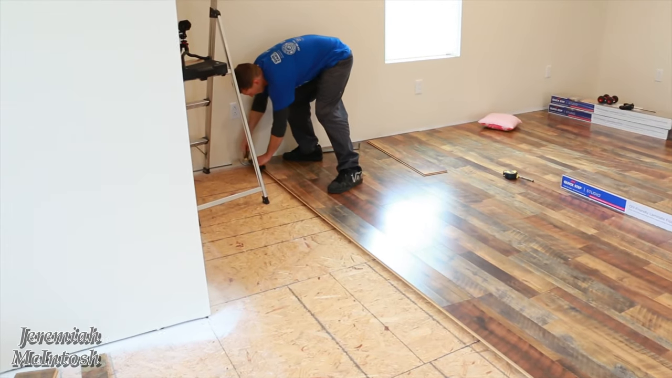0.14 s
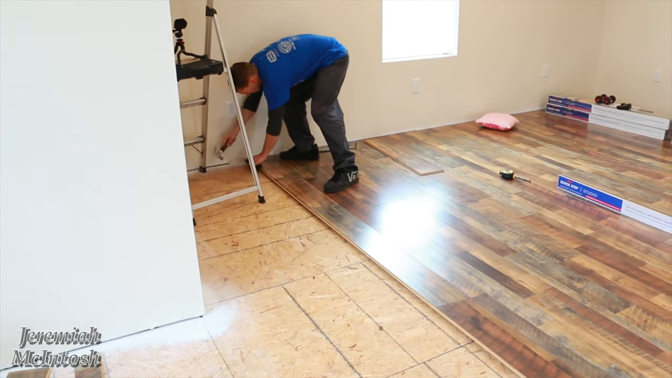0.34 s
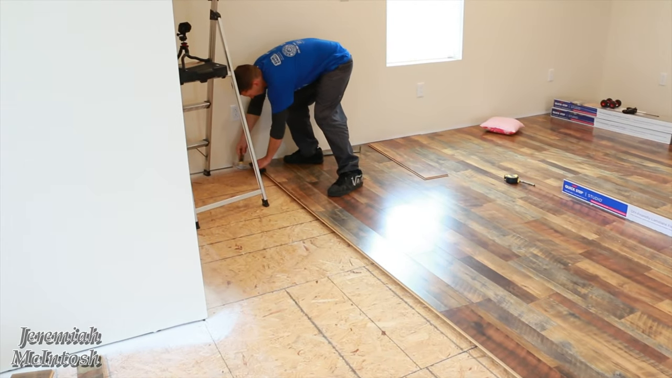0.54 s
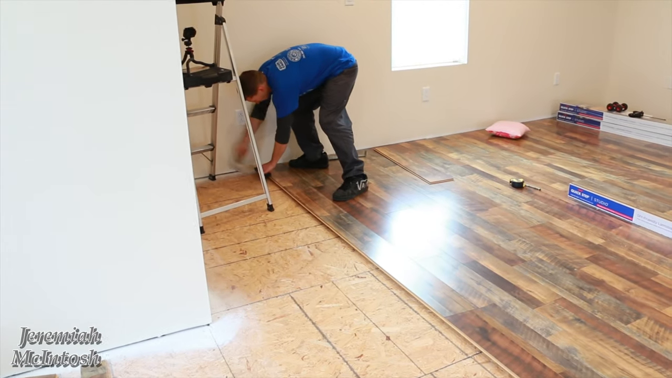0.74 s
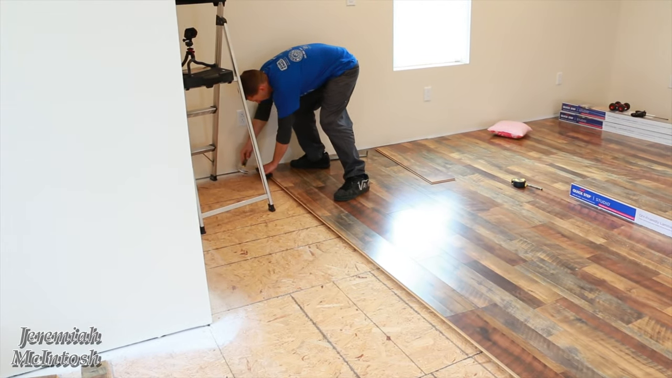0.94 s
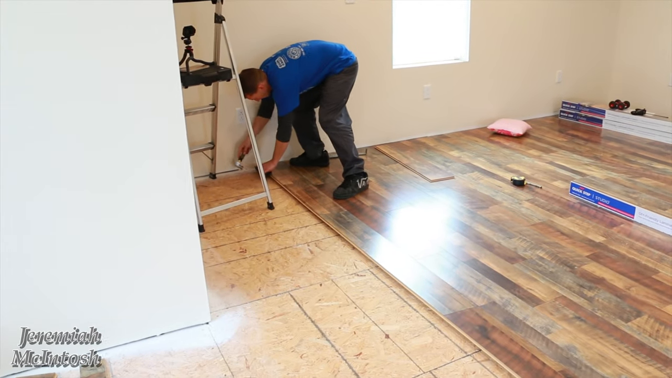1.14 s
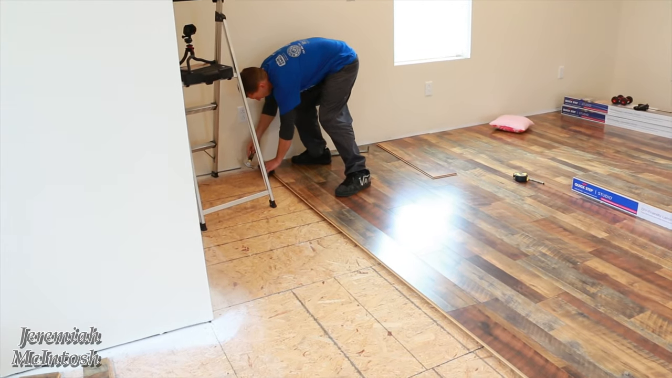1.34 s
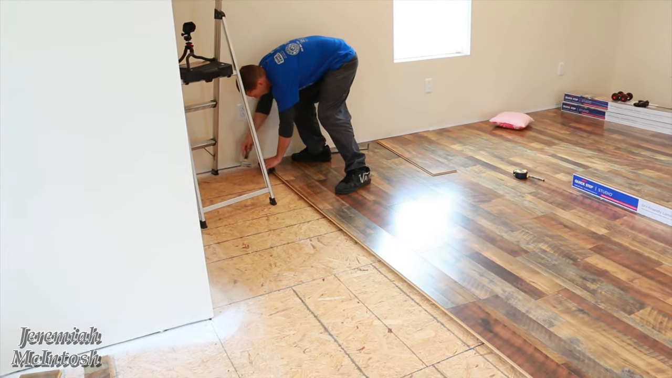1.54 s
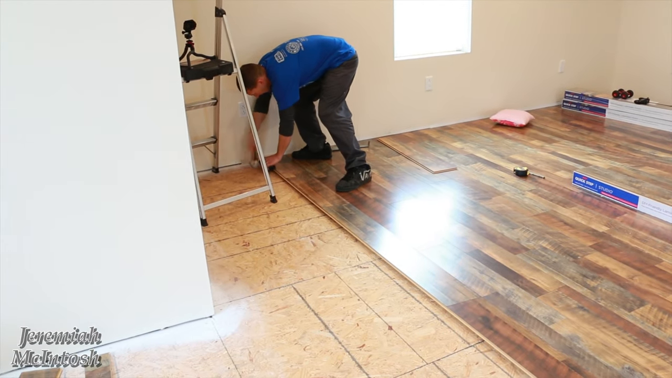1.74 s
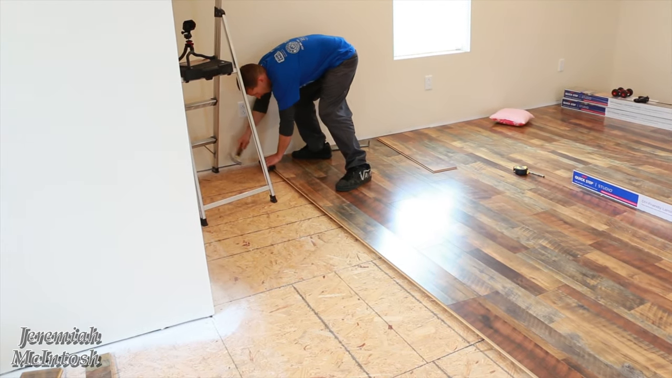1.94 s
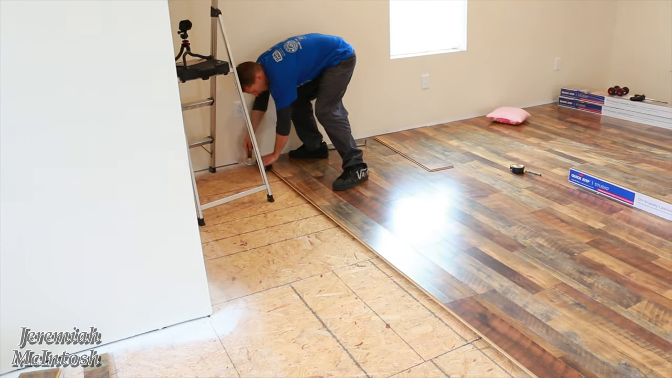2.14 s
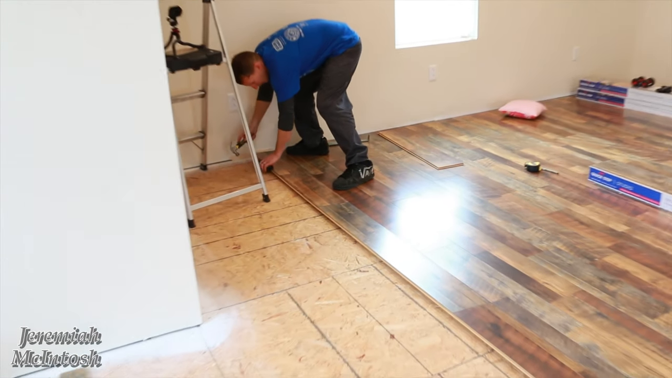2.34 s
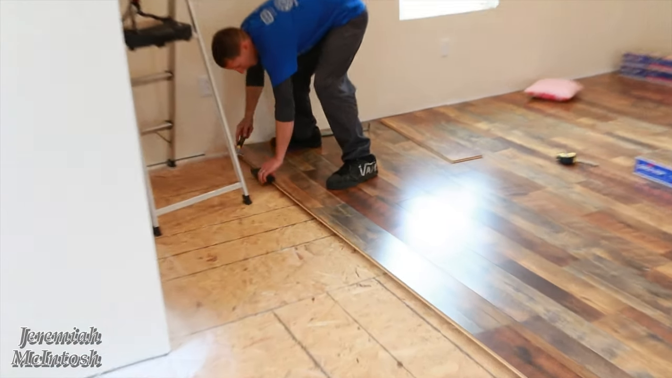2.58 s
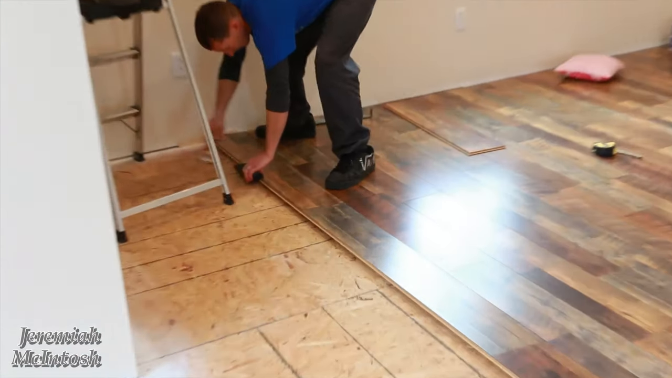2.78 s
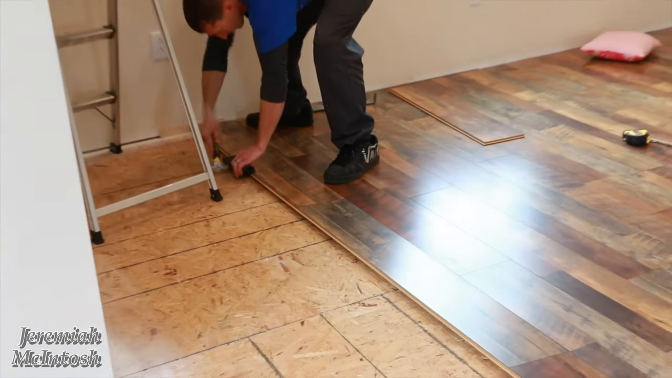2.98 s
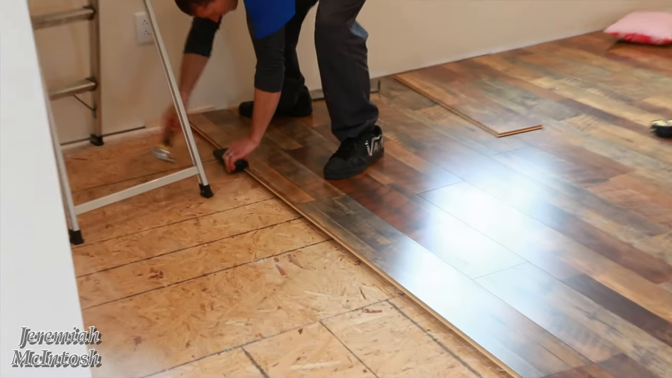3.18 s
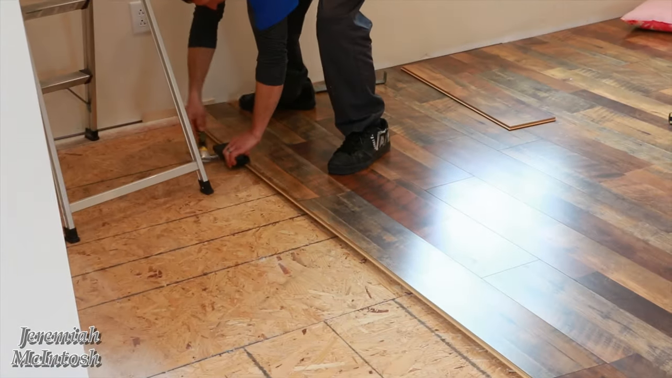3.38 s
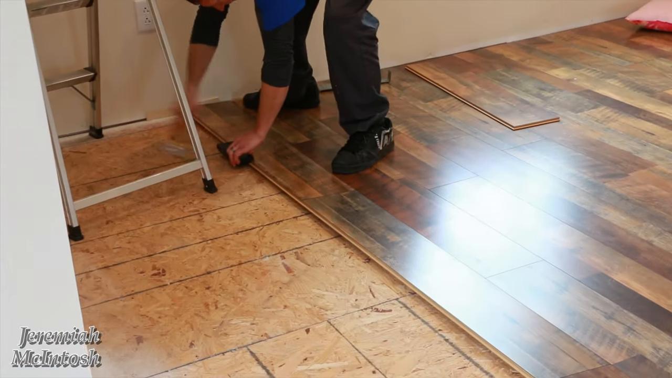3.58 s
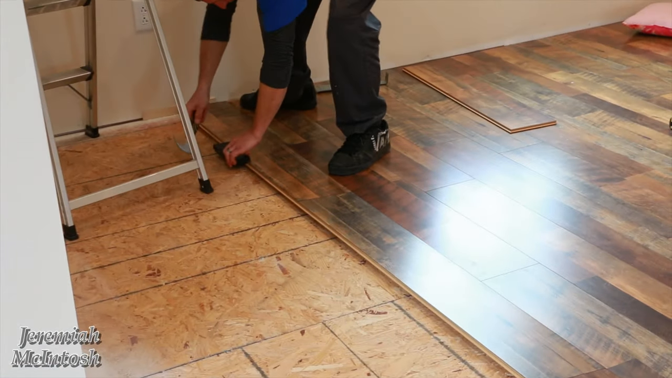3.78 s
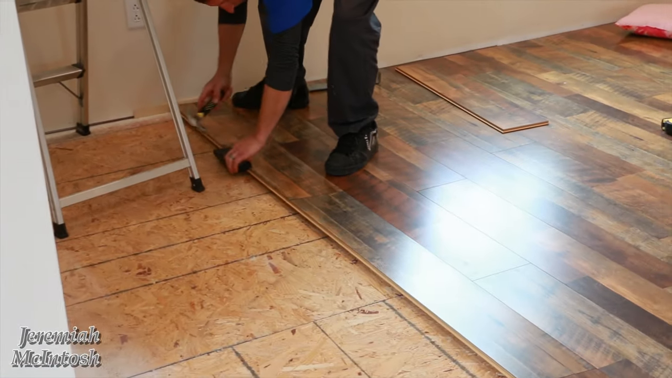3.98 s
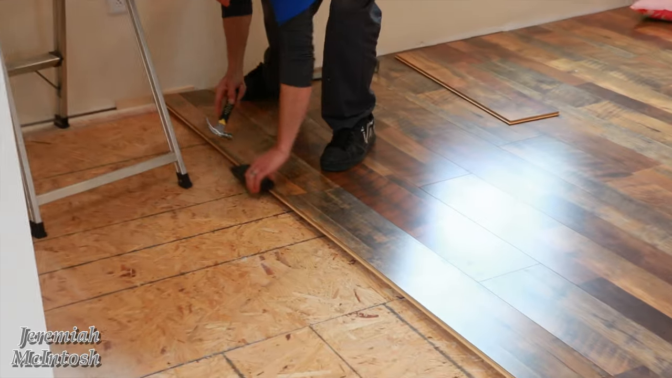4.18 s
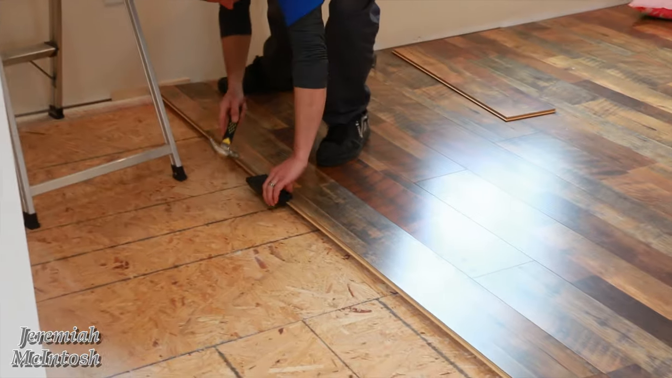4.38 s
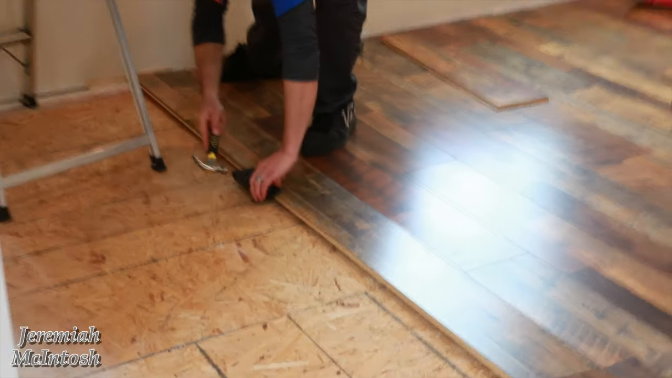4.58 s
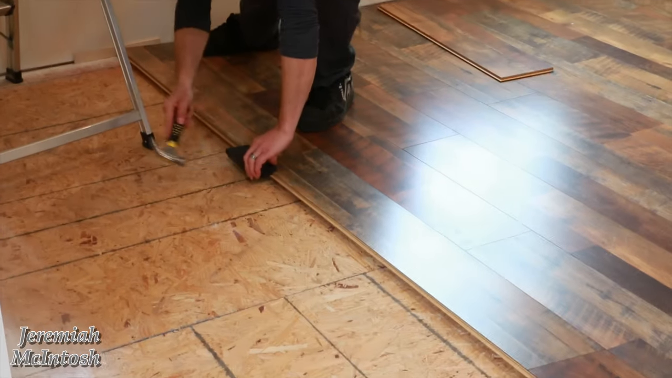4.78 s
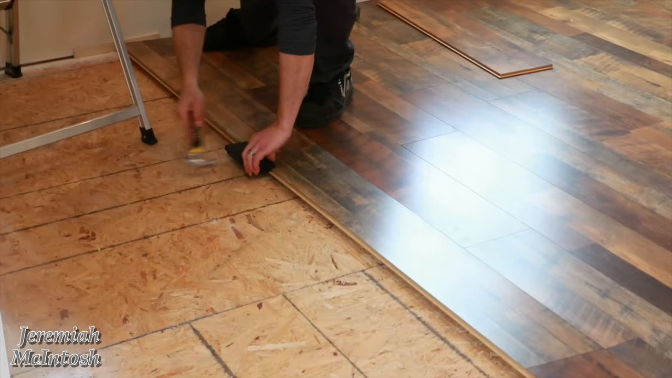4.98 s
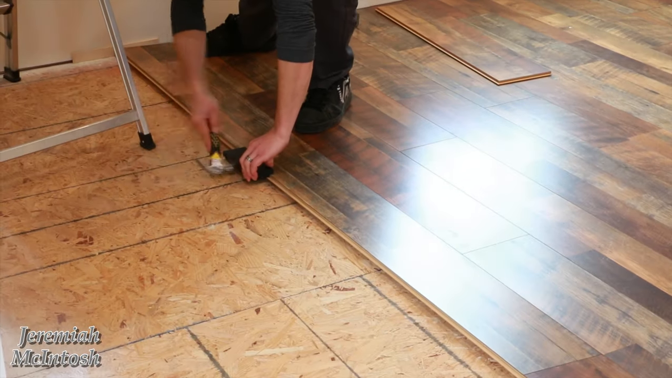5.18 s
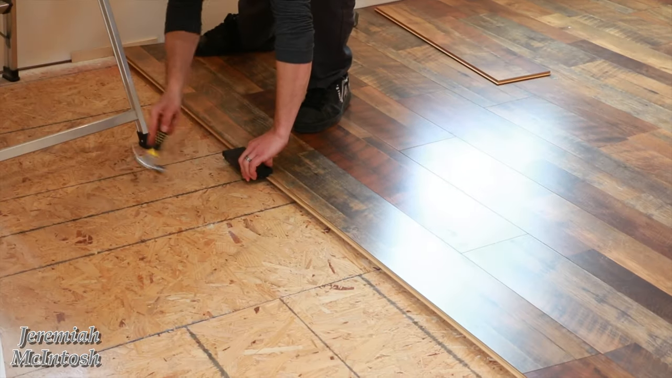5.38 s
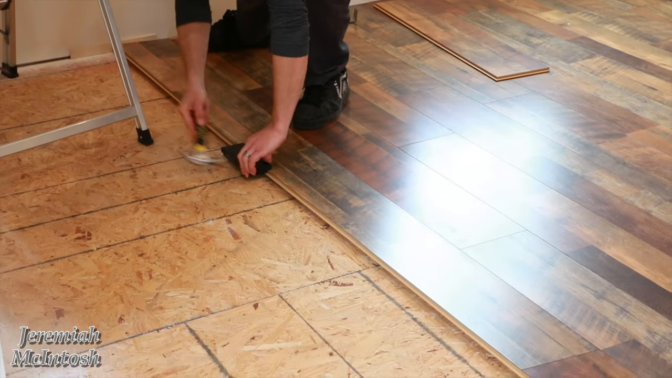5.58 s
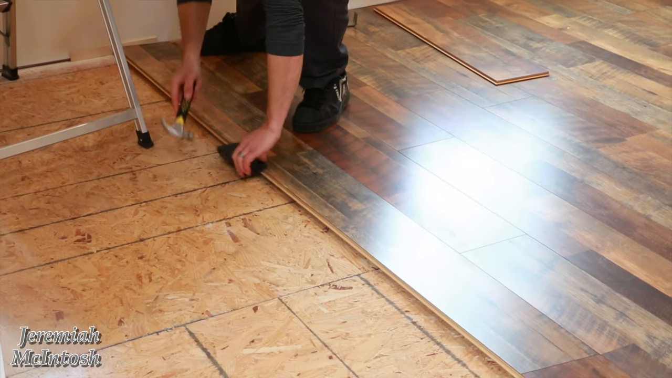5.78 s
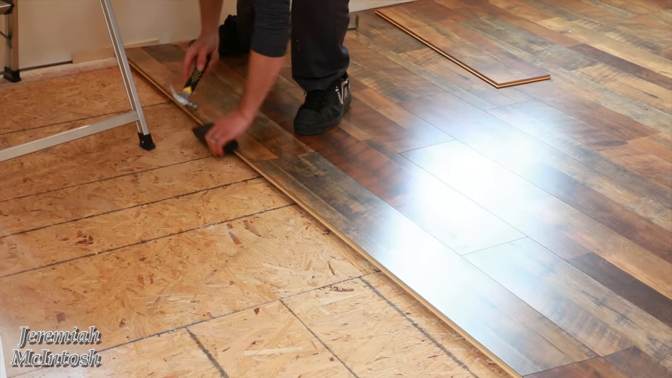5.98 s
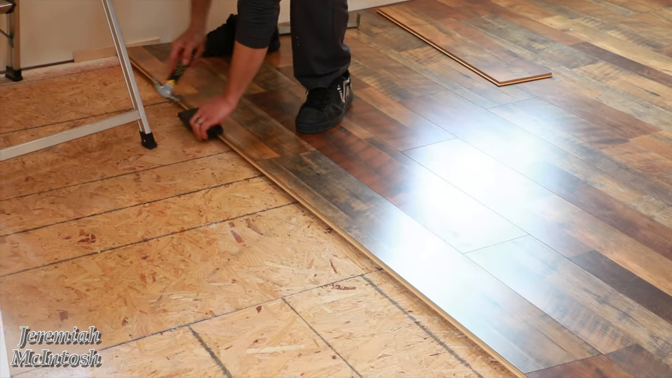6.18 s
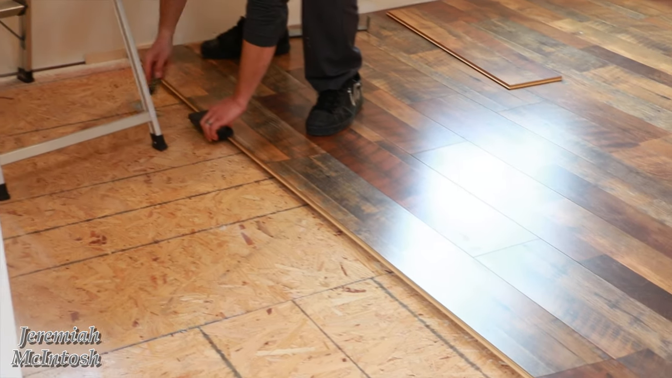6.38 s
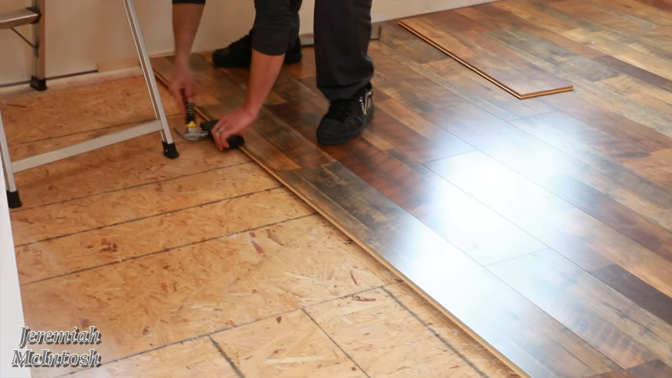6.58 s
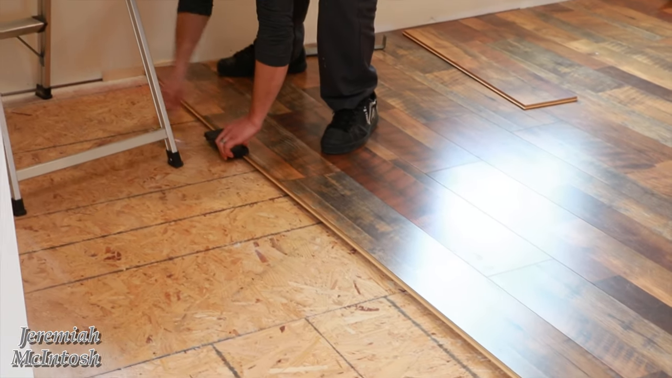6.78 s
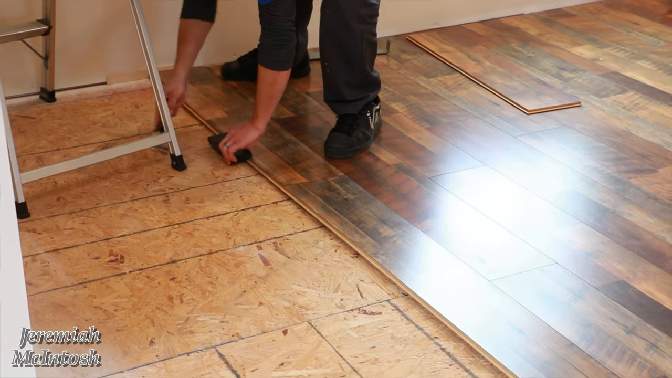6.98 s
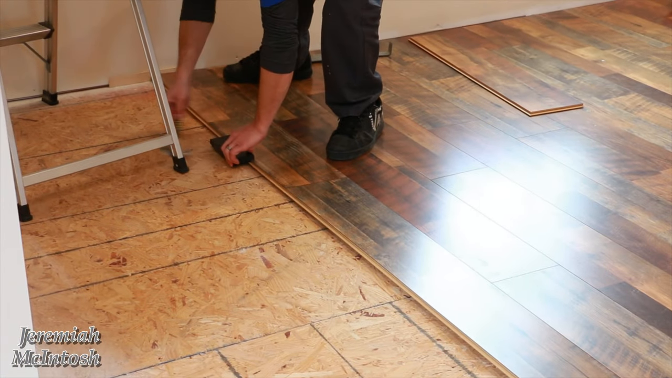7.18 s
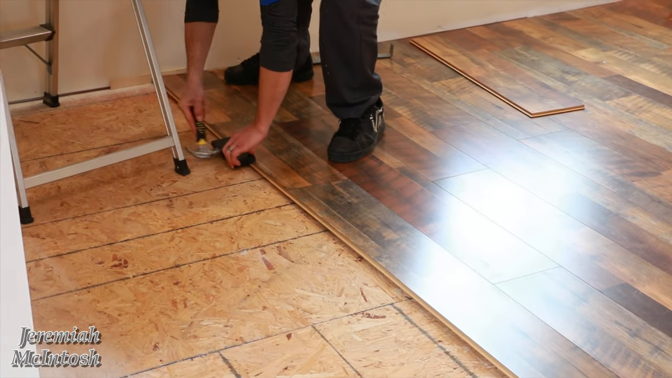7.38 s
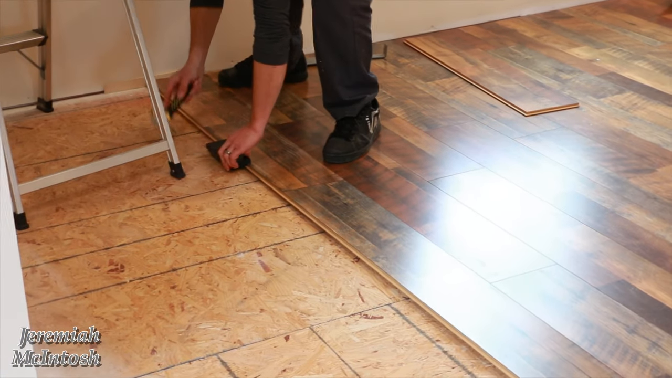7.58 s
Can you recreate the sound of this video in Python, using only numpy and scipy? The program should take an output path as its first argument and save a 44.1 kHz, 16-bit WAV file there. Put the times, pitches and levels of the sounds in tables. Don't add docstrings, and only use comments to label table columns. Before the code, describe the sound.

Three loud knocks open, their tails already filling the bare room, then a pair, two groups of three, and a final faster group of four. Each is a hard wooden crack with a short low floor boom and sustained, compressed echo. In the gaps come soft gritty slides, a dull thud or two and tiny ticks, with quiet room hush and microphone rumble beneath.

```python
import sys
import numpy as np
from scipy import signal
from scipy.fft import rfft, irfft, next_fast_len
from scipy.io import wavfile
from scipy.ndimage import uniform_filter1d, map_coordinates

SR = 44100
rng = np.random.default_rng(int(sys.argv[2]) if len(sys.argv) > 2 else 0)


def int16_out(signal):
    q = np.round(np.clip(np.atleast_2d(signal).T, -1, 1) * 32767)
    wavfile.write(sys.argv[1], SR, q.astype(np.int16))


def gain_from_decibels(decibels):
    exponent = np.asarray(decibels, float) / 20
    return 10 ** exponent


N = 336483

# centre in Hz, width in Hz, height in dB, extra ringing in s.
BOARD_MODES = [(651, 100, 2, 0.38), (780, 250, 2.5, 0.038), (1140, 20, 4, 0.033), (1490, 550, 0.5, 0.15),
               (2146, 910, 2.5, 0.26), (3000, 420, 0, 0.098), (7030, 110, -3, 0.074)]


def unit(x):
    return x / np.sqrt(np.mean(x ** 2) + 1e-20)


def along(points, hz):
    f, v = np.transpose(points)
    return np.interp(np.log(hz + 1), np.log(f + 1), v)


def coloured(x, colour_db):
    m = next_fast_len(len(x) + 4096)
    log_gain = np.log(gain_from_decibels(colour_db(np.fft.rfftfreq(m, 1 / SR))) + 1e-6)
    cepstrum = irfft(log_gain, m)
    cepstrum[1:m // 2] *= 2
    cepstrum[m // 2 + 1:] = 0
    response = np.exp(rfft(cepstrum))
    return irfft(rfft(x, m) * response, m)[:len(x)]


def noise(spectrum):
    return unit(coloured(rng.standard_normal(N), lambda hz: along(spectrum, hz)))


def at(table, s):
    return table[max(start for start in table if start <= s)]


def bell(hz, centre, width):
    return 1 / (1 + (2 * (hz - centre) / width) ** 2)


def peaks(hz, heights):
    return sum(h * bell(hz, mode[0], mode[1]) for mode, h in zip(BOARD_MODES, heights))


def blow_colour(hz, spectrum, body_db, ring_db):
    tilt = [(450, body_db), (1100, ring_db), (2400, 0.015)]
    return along(spectrum, hz) + along(tilt, hz) + peaks(hz, [mode[2] for mode in BOARD_MODES])


def ring_colour(hz, s):
    plank_modes = {0: [(653, 74, 8.5), (1500, 600, 8), (3600, 180, 6), (4630, 330, 7)], 1.5: [(640, 52, 16),
                   (1440, 150, 6.5), (2060, 170, 10), (3640, 370, 7), (4600, 370, 6.5)],
                   2.9: [(947, 350, 5.5), (1880, 150, 12), (2410, 360, 6), (3180, 250, 8)],
                   4.8: [(1000, 110, 2), (1440, 110, 1.5), (1850, 210, 6), (2920, 2200, 4.5),
                   (2860, 350, 6)], 6.5: [(925, 38, 9.5), (1240, 120, 10), (1860, 130, 1), (3090, 420, 10),
                   (3900, 300, 4)]}
    return sum(db * bell(hz, centre, width) for centre, width, db in at(plank_modes, s))


def early(ms):
    build_ms, build_db, even_db = 7.1, 58, 5
    bunch_gap_ms, bunch_width_ms, bunch_db = 10.9, 4.1, 7.5
    full_ms = FIELD_FULL_MS = 24.46 * 0 + build_ms
    bunches = sum(np.exp(-((ms - 24.46 - k * bunch_gap_ms) / bunch_width_ms) ** 2) for k in (0, 1, 2))
    return even_db - build_db * np.clip(1 - ms / full_ms, 0, 1) + bunch_db * bunches


def tail(colour_db):
    # frequency in Hz, reverberation time t60 in s.
    room_t60 = [(60, 0.39), (250, 0.97), (600, 1.164), (1200, 1.402), (2500, 0.99), (5000, 1.23),
                (8000, 0.74), (12000, 0.56), (16000, .35)]
    hz, t, z = signal.stft(rng.standard_normal(2 * SR), SR, nperseg=1024)
    t60 = (along(room_t60, hz) + peaks(hz, [mode[3] for mode in BOARD_MODES]))[:, None]
    own_decay = gain_from_decibels(-60 * t / (0.91 * t60))
    next_room = gain_from_decibels(-15.5 - 60 * t / (1.506 * t60))
    clumps = uniform_filter1d(rng.standard_normal(z.shape), size=7, axis=0)
    clumps = uniform_filter1d(clumps, size=4, axis=1)
    z = z * np.hypot(own_decay, next_room) * gain_from_decibels(1.18 * unit(clumps))
    field = signal.istft(z, SR, nperseg=1024)[1][:2 * SR]
    field = coloured(field * gain_from_decibels(early(np.arange(2 * SR) / SR * 1000)), colour_db)
    return field / np.sqrt(np.mean(field[SR // 20:SR // 10] ** 2))


def burst(ms, start, db, t60_ms, rise_ms):
    rise = 1 - np.exp(-np.clip(ms - start, 0, None) / rise_ms)
    return gain_from_decibels(db - 60 * np.abs(ms - start) / t60_ms) * rise


def knock(lag_ms, colour_db):
    ms = np.arange(SR // 10) / SR * 1000
    grit = rng.standard_normal((2, len(ms)))
    soft = uniform_filter1d(grit[0], size=5) * burst(ms, 0, 2.9, 51, 2.7)
    plank = burst(ms, lag_ms, 2.5, 15.4, 0.3)
    rattle = burst(ms, 2.16 * lag_ms, -3.5, 11.4, .25)
    sharp = grit[1] * (plank + rattle)
    pulses = [(.55, .6), (lag_ms + 0.306, -1.1), (1.65 * lag_ms, 1.1)]  # (ms, size)
    strike = sum(size * np.exp(-((ms - start) / 0.067) ** 2) for start, size in pulses)
    out = coloured(soft + sharp + gain_from_decibels(6) * strike, colour_db)
    return out / np.max(np.abs(out))


def walls(near):
    wall_ms = [22, 31, 36, 45.5, 75]
    wall_db = [-24, -29, -21, -21, -31]
    echoes = np.zeros(len(near))
    echoes[0] = 1
    for ms, db, (a, b) in zip(wall_ms, wall_db, rng.standard_normal((len(wall_ms), 2))):
        echoes[round((ms + .6 * b) * SR / 1000)] = gain_from_decibels(db + 2.3 * a)
    return signal.fftconvolve(near, echoes)[:len(near)]


def boom(body_db):
    # frequency in Hz, level in dB, t60 in s.
    joists = [(78.2, -26, 0.51), (149.2, -22, 0.47)]
    t = np.arange(SR // 2) / SR
    shake = uniform_filter1d(rng.standard_normal((len(joists), len(t))), size=900)
    shake = unit(uniform_filter1d(shake, size=900))
    out = np.zeros(len(t))
    for (hz, db, t60), sway in zip(joists, shake):
        level_db = db + 1.64 * body_db
        out += gain_from_decibels(level_db - 60 * t / t60) * sway * np.sin(2 * np.pi * hz * t)
    return out * (1 - np.exp(-t / 0.0027))


def hammer():
    # start in s, strength in dB, body in dB, ring in dB, directness in dB.
    blows = [(0.156, -3.5, 1, -2, 0.5), (0.485, -2.5, -1, 0.5, 3.5), (0.823, -2, -1, 0.5, 2.5),
             (1.793, -1.5, -2, 2, 2.5), (2.092, -3.5, 0, 0.5, -3), (3.0265, -2, -2.5, -0.5, 1.5),
             (3.357, -2.5, -3, 2, 1), (3.659, -4.5, -0.5, 2, 2.5), (4.896, -3, -2.5, -1.5, 2.5),
             (5.221, -2.5, -1.5, 4.5, -0.5), (5.516, -5, -2, 3.5, 2), (6.57, -3, -3.5, 1, 2.5),
             (6.861, -3.5, -1.5, 4.5, -1), (7.107, -3, 0, 7.5, -0.5), (7.345, -4.5, 4, 7.5, -0.5)]
    # frequency in Hz, density in dB per Hz.
    direct_spectrum = [(40, -69), (150, -18), (300, -14), (680, -2.5), (1500, -7), (2400, -5), (3000, -2.5),
                       (5000, -1.5), (6300, -6), (8800, -9.5), (13000, -35), (16000, -48)]
    # frequency in Hz, density in dB per Hz.
    field_spectrum = [(59, -77), (100, -20.5), (153, -33), (193, -15), (389, -6), (452, -5.5), (662, -4.5),
                      (1130, -3.5), (1760, -6.5), (3120, -1), (8830, -21.5), (12500, -36), (14500, -39),
                      (16000, -44)]
    drum_db = {0: 0.1, 1.5: -1.1, 2.9: 3, 4.8: 1.1, 6.5: -4.9}
    out = np.zeros(N + 2 * SR)
    for s, db, body_db, ring_db, direct_db in blows:
        def near_colour(hz):
            return blow_colour(hz, direct_spectrum, body_db, ring_db) + ring_colour(hz, s)

        def field_colour(hz):
            colour = blow_colour(hz, field_spectrum, body_db, ring_db)
            return colour + 0.15 * ring_colour(hz, s) + peaks(hz, [at(drum_db, s)])

        near = knock(2.833, near_colour)
        after = out[round(s * SR):]
        after[:len(near)] += gain_from_decibels(db + direct_db + 21.5) * walls(near)
        after[:SR // 2] += gain_from_decibels(db) * boom(body_db)
        after[:2 * SR] += gain_from_decibels(db - 1.0) * tail(field_colour)
    earlier = tail(lambda hz: blow_colour(hz, field_spectrum, 2.2, 4))
    out[:SR] += gain_from_decibels(-13.0) * earlier[SR:]
    return out[:N]


def quiet_room():
    # frequency in Hz, density in dB per Hz.
    hush = [(50, -3), (100, -11), (200, -12.5), (400, -7), (1000, -6), (3000, -27), (6000, -24.5),
            (11000, -33.5), (15500, -37), (16500, -64)]
    return gain_from_decibels(-54.5) * noise(hush)


def handling():
    # middle in s, half length in s, rumble in dB.
    moves = [
        (0.036, 0.22, -54),
        (1.5, 0.25, -74),
        (2.75, 0.52, -64),
        (4.72, .3, -61.5),
    ]
    # frequency in Hz, density in dB per Hz.
    rumble = [(8, -4), (20, 0), (40, -7), (65, -10), (85, -22), (130, -26), (250, -50)]
    t = np.arange(N) / SR
    lumps = gain_from_decibels(2.5 * map_coordinates(rng.standard_normal(N * 12 // SR + 4), [t * 12]))
    swell = gain_from_decibels(-74)
    swell = swell + sum(gain_from_decibels(db) * np.exp(-((t - s) / half) ** 2) for s, half, db in moves)
    return gain_from_decibels(10) * swell * unit(lumps * noise(rumble))


def ticks():
    # start in s, level in dB, centre in Hz, t60 in s.
    contacts = [
        (.13, -50, 6500, .02),
        (4.322, -75, 12000, .015),
        (4.326, -37, 370, 0.29),
        (4.48, -45.5, 342, 0.34),
        (4.822, -56, 7050, .015),
    ]
    out = np.zeros(N + SR)
    t = np.arange(SR // 4) / SR
    for s, db, hz, t60 in contacts:
        puff = coloured(rng.standard_normal(len(t)), lambda f: -14 * np.abs(np.log2((f + 1) / hz)))
        out[round(s * SR):][:len(t)] += gain_from_decibels(db - 60 * t / t60) * unit(puff)
    return out[:N]


def slides():
    # start in s, rise in s, hold in s, level in dB, brightness in dB.
    pushes = [
        (1.17, .08, .15, -73, 1.5),
        (2.42, 0.072, 0.2, -54.5, -1.5),
        (4.06, 0.11, 0.23, -54, -7),
        (5.965, .02, .17, -58, 6),
    ]
    # frequency in Hz, density in dB per Hz.
    scrape_spectrum = [(1500, -17), (4000, 16), (6000, 4.5), (8800, 6.5), (10500, -4), (13000, -3),
                       (15500, -13), (16500, -37)]
    depth_db, fade_db_per_s = 10, 73
    t = np.arange(N) / SR
    grain = gain_from_decibels(1.2 * unit(uniform_filter1d(rng.standard_normal(N), size=300)))
    scrape = unit(grain * noise(scrape_spectrum))
    out = np.zeros(N)
    for s, rise, hold, db, bright_db in pushes:
        tilt = [(4000, -bright_db), (14000, bright_db)]
        rise_db = -depth_db * np.clip(1 - (t - s) / rise, 0, 1)
        fade_db = -fade_db_per_s * np.clip(t - s - rise - hold, 0, None)
        out += (t > s) * gain_from_decibels(db + rise_db + fade_db) * coloured(scrape, lambda hz: along(tilt, hz))
    return gain_from_decibels(3.5) * out


def scene():
    return (hammer() + ticks() + slides() + quiet_room() + handling())[None]


def roll_off(x):
    return signal.sosfilt(signal.butter(12, 16690, fs=SR, output="sos"), x)


def record(dry):
    ceiling_db, overload = -18.5, .975
    memory = np.exp(-1 / (0.018 * SR))
    heard = np.clip(dry, -2.5, 2.5)
    power = signal.lfilter([1 - memory], [1, -memory], heard ** 2)
    held = dry / (1 + (power / gain_from_decibels(2 * ceiling_db)) ** 2.052) ** (.5 / 2.313)
    clipped = np.clip(held, -overload, overload)
    m = next_fast_len(N)
    band = [(60, -7), (200, 0), (15700, 0), (15900, -21)]  # (Hz, dB)
    gain = gain_from_decibels(along(band, np.fft.rfftfreq(m, 1 / SR)))
    banded = irfft(rfft(clipped, m) * gain, m)[:, :N]
    return roll_off(banded)


dry = scene()
out = record(dry)
int16_out(out)
```